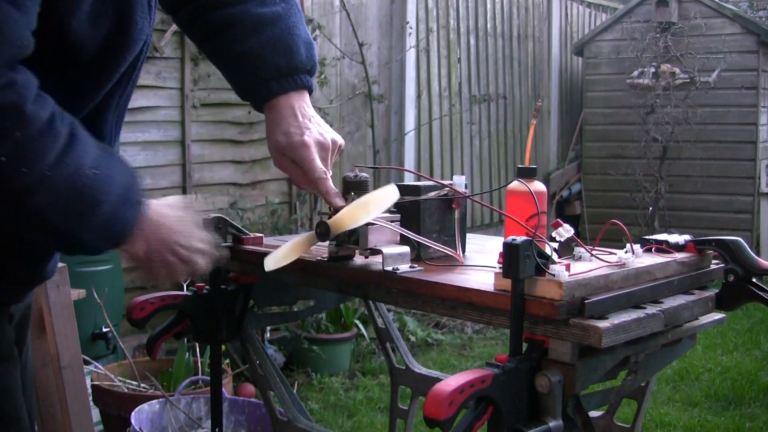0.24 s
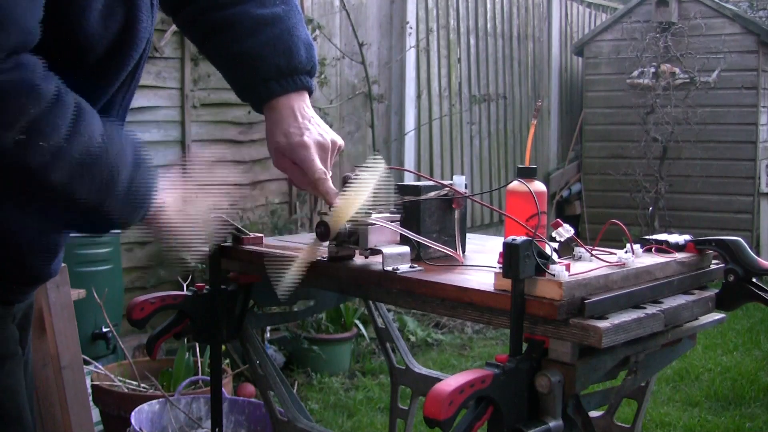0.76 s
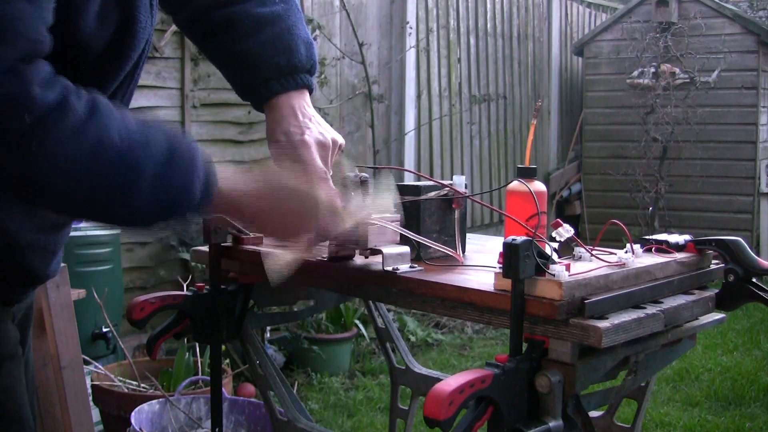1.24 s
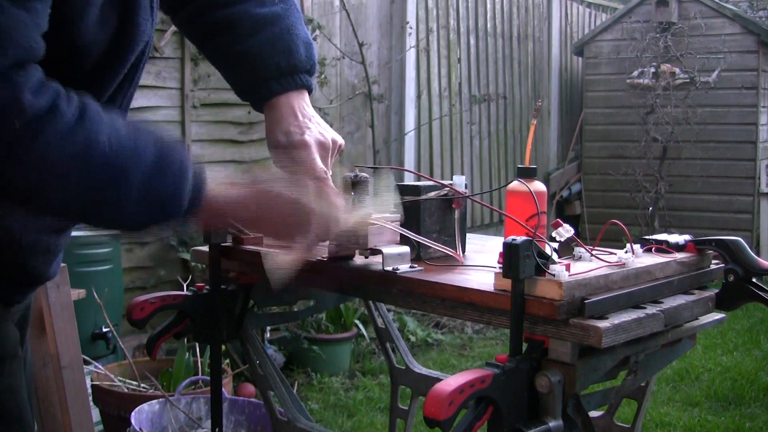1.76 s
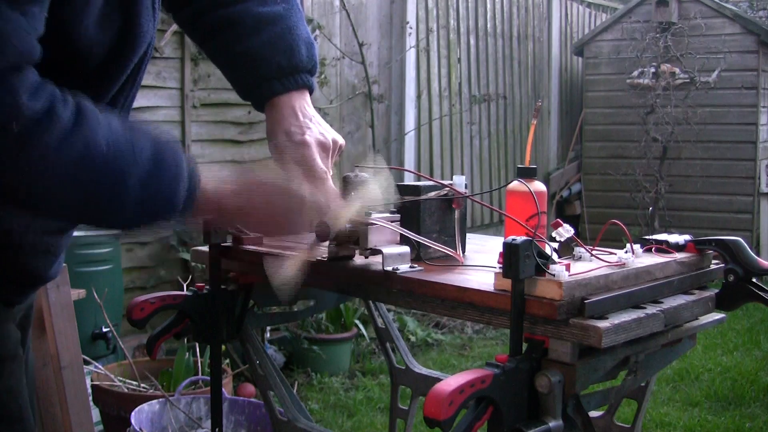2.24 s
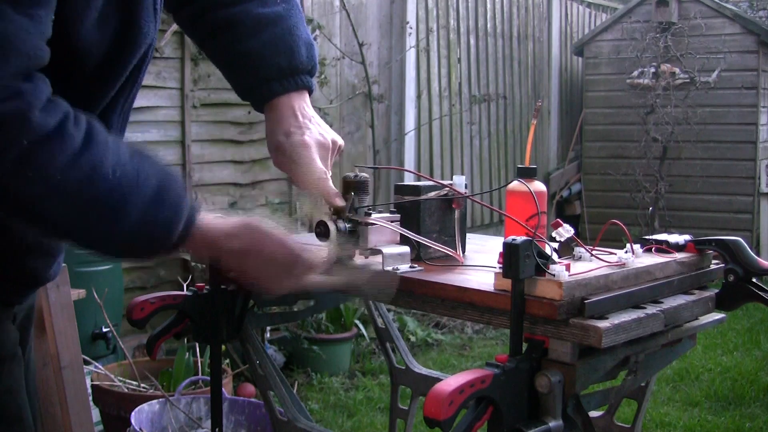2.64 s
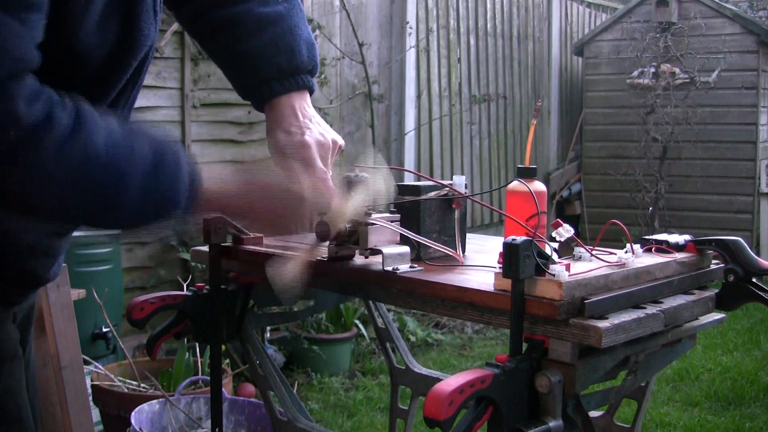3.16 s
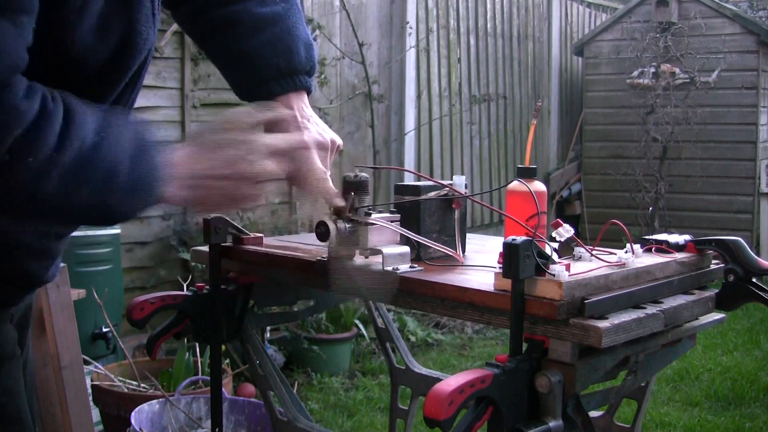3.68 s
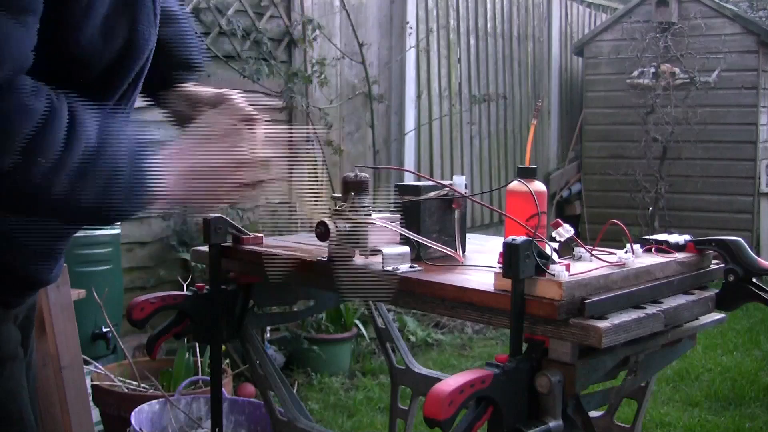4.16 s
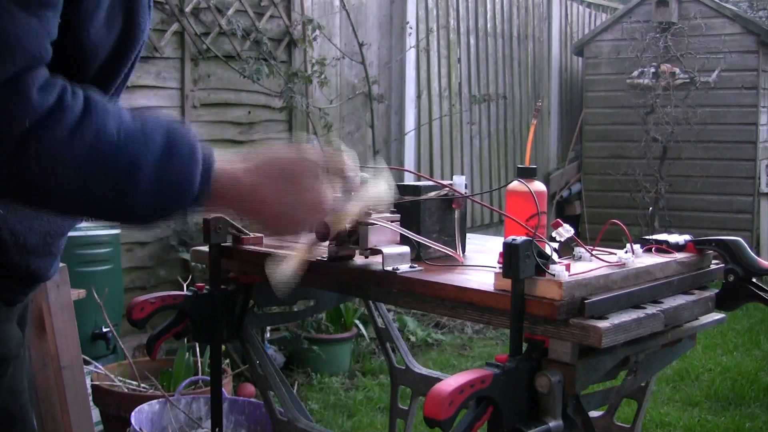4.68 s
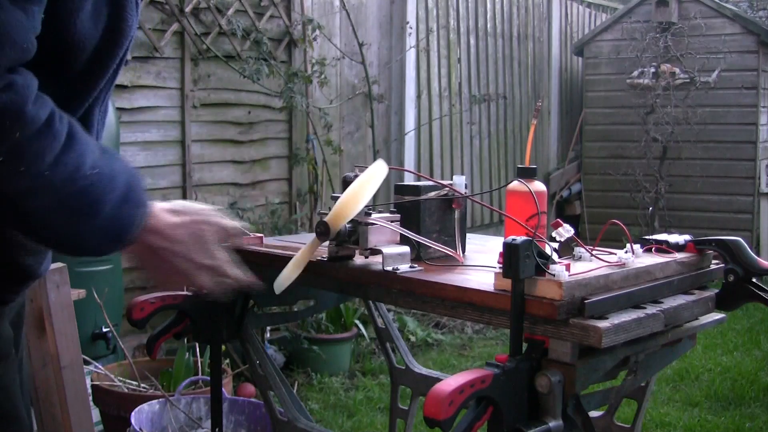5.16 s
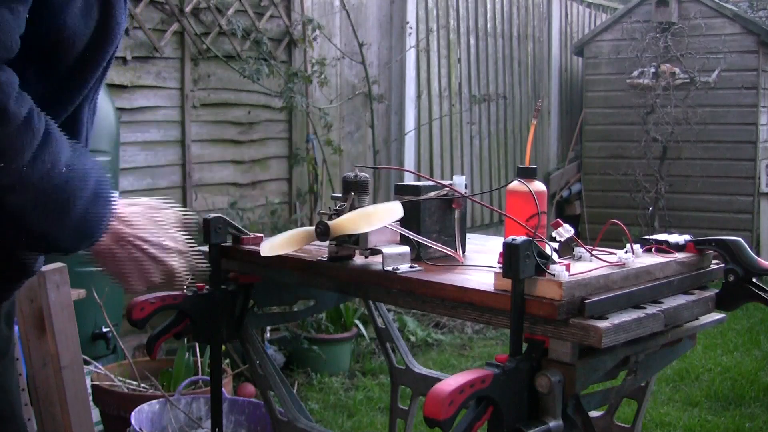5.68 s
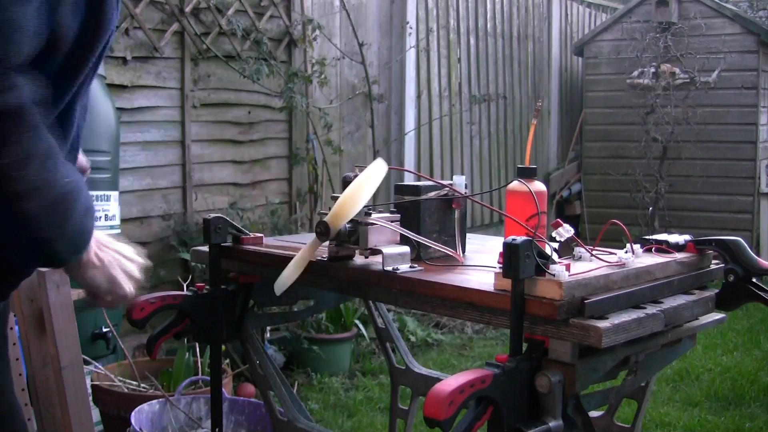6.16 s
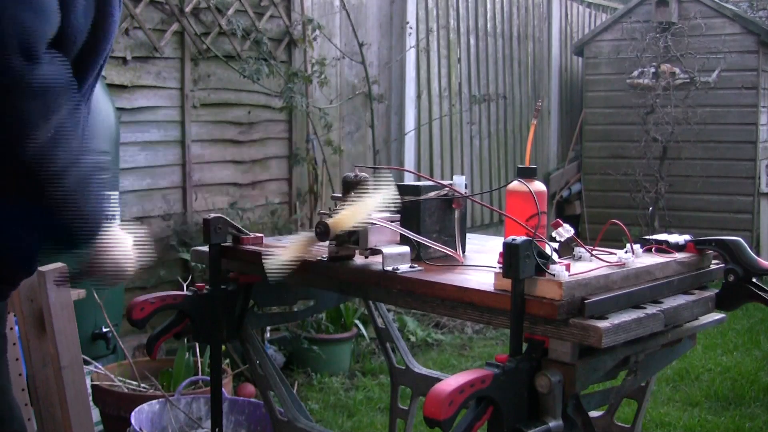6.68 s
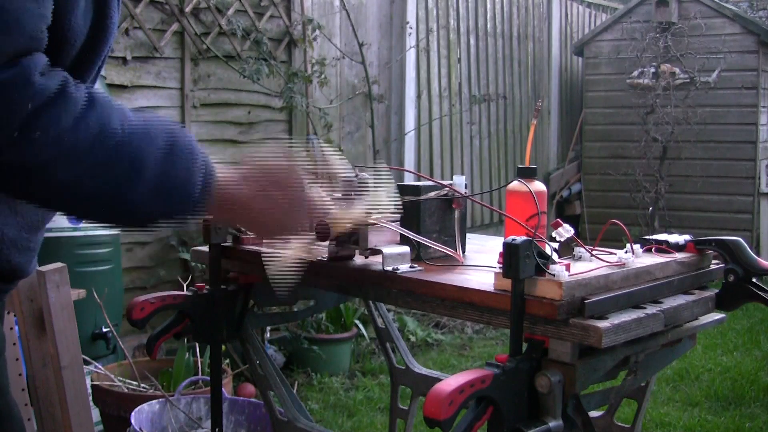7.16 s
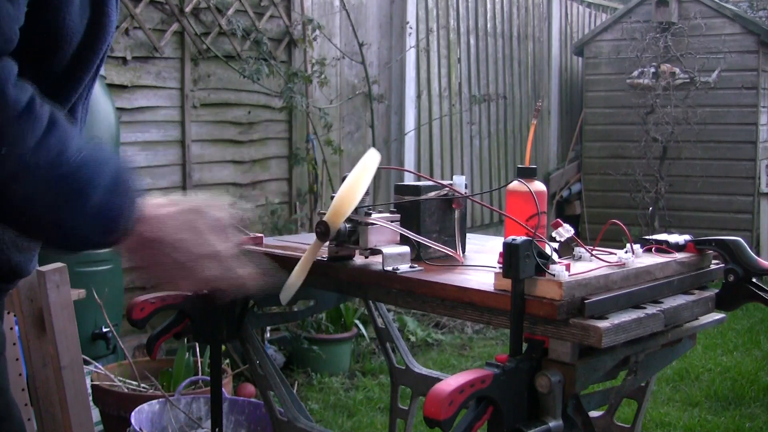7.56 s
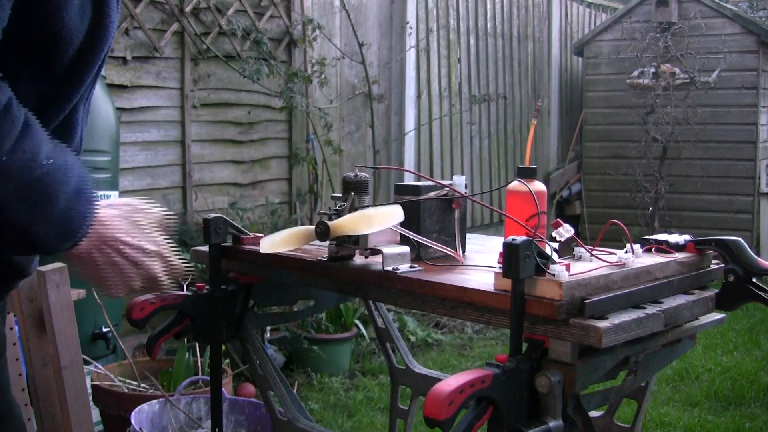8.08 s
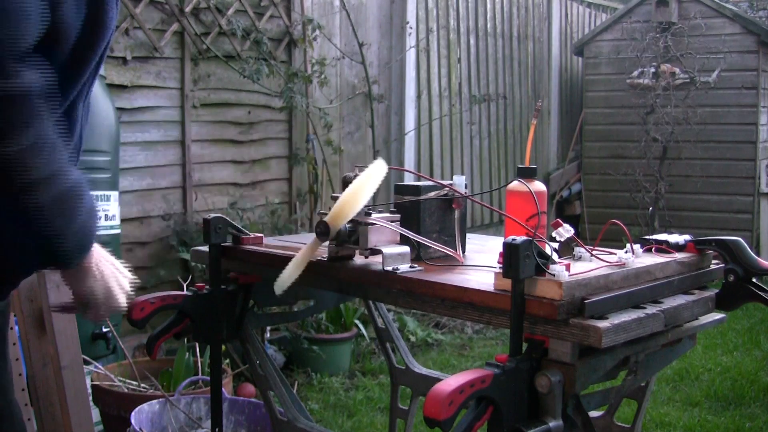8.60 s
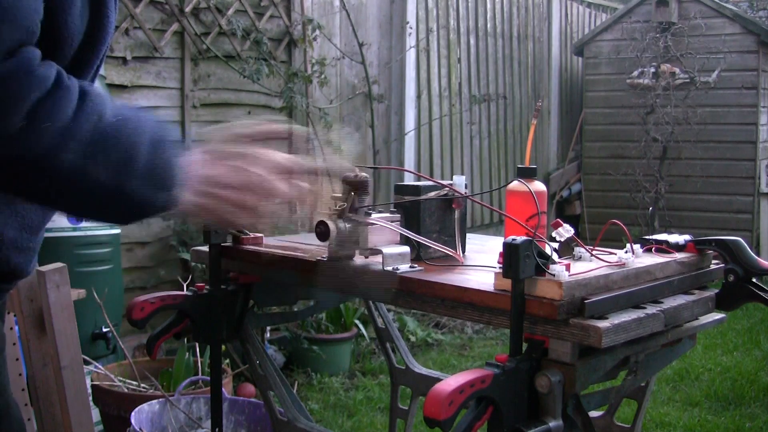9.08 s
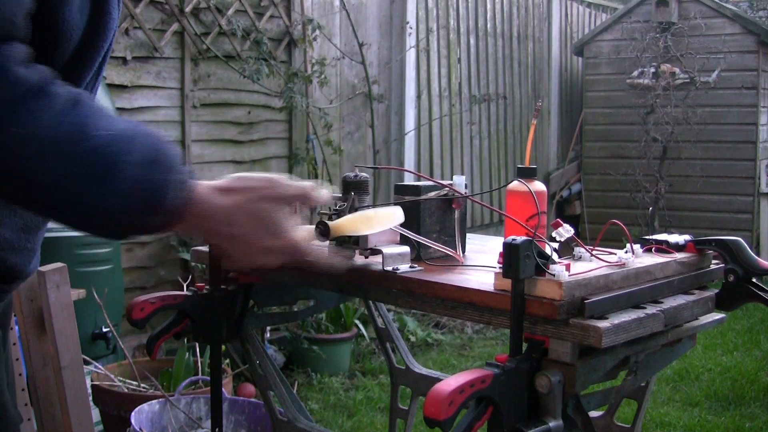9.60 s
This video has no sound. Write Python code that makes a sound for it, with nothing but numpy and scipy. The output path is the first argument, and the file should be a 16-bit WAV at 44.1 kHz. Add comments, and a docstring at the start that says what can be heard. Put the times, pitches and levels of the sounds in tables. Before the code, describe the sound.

A small engine on a wooden workbench is flicked by hand in a fenced yard, heard close in stereo with short, scattered echoes. A soft pop at 0.03 s leads at once to a loud clack and thud near 0.16-0.18. From 0.7 to 4 s flicks come roughly every half second: crisp finger ticks, hollow midrange pops and, between them, low woody compression thuds. A snappy clack and rattles cluster at 4.0-4.6, then a pop at 5.0 with a tiny hiss, and a bright slap at 5.5. Strong flicks land at 6.1, 7.3 and 8.6, each trailing a faint fuzzy whistle near 3 kHz that sinks slightly; the hardest metallic clacks crack at 6.7, 7.9 and 9.2. A weak flick ends it at 9.8. Sleeves rustle softly with each swing; low distant town air and very faint bird chirps remain. The engine never runs.

```python
"""A model engine clamped to a workbench in a fenced yard is flicked over by hand and never catches.
Each flick sums short coloured noise bursts: finger tick, knock, thud of compression, pop at the port.
Clacks, from faint to hard, wake metal modes; the bench rings and the fences scatter each blow as noise.
Trapped air past the piston is a hiss with a fuzzy whistle; sleeves and town air are shaped noise,
and faint far birds are falling sine notes."""
import sys
import numpy as np
from scipy import signal
from scipy.fft import rfft, irfft, next_fast_len
from scipy.io import wavfile
from scipy.ndimage import uniform_filter1d

SR = 44100
rng = np.random.default_rng(int(sys.argv[2]) if len(sys.argv) > 2 else 0)


def generate_wav(sig):
    """Save sig (samples, or channels by samples) to the path in sys.argv[1] as 16-bit PCM at SR."""
    pcm = np.round(np.clip(np.atleast_2d(sig).T, -1, 1) * 32767).astype(np.int16)
    wavfile.write(sys.argv[1], SR, pcm)


N = 433944  # samples
BLOW_N = 12288  # samples in one blow with its echoes

# Levels of FLICKS, THUMPS, BRUSHES and CLACKS precede the common gain of each kind of blow.
# finger snaps the blade through compression: t/s, swing until the port opens/s, tick/dB, knock/dB,
# pop/dB, thud/dB, treble tilt/(dB/octave)
FLICKS = [(0.0251, 0.012, -35, -56, -18.5, -35.5, 2), (0.1561, 0.0039, -13, -16.5, -21.5, -19, -3.5),
          (0.7113, 0.0186, -34.5, -57, -34, -52, 0), (0.839, 0.0068, -31, -42, -22.5, -31.5, -3),
          (1.4506, 0.008, -19, -42, -23, -28.5, -3.5), (1.9729, 0.009, -31, -29.5, -23, -29.5, -0.5),
          (2.4344, 0.009, -13, -25, -22, -33, -2), (2.9051, 0.016, -17, -27.5, -26, -29.5, -3),
          (3.3428, 0.012, -17, -24, -21.5, -32.5, -2.5), (3.7925, 0.019, -20, -26, -33, -25.5, -1),
          (4.0437, 0.0037, -23, -28, -41, -26, -2.5), (4.2652, 0.013, -15, -19, -28, -26, 1.5),
          (4.6417, 0.004, -16, -30, -39, -35.5, -1.5), (4.9097, 0.012, -30, -25, -31, -32.5, 3),
          (4.9778, 0.00091, -22, -26, -17, -40, -1.5), (5.5135, 0.0044, -46, -33, -26.5, -31.5, -5),
          (6.1411, 0.016, -16.5, -17.5, -18.5, -30, 5), (6.667, 0.012, -35, -27, -34, -25, 0),
          (7.3339, 0.0093, -19.5, -22.5, -20, -27, 1), (7.877, 0.012, -22, -22.5, -33, -17, -1.5),
          (8.589, 0.014, -24, -21.5, -24, -28, 2.5), (9.1603, 0.014, -35, -29.5, -41, -23, -1),
          (9.7666, 0.018, -34, -50, -34, -41, -5.5)]
# piston runs heavily into compression: t/s, level/dB, treble tilt of its tick and thud/(dB/octave), ring f/Hz
THUMPS = [(0.178, -18.5, -0.5, 600), (1.206, -30.5, 0.5, 343), (1.73, -27.5, 0.5, 390),
          (1.758, -38.5, 3.5, 339), (2.217, -22.5, 1.5, 430), (2.692, -22.5, 0, 470),
          (3.145, -21, 1.64, 520), (3.587, -23.5, 1.1, 288), (4.145, -35, -3, 368), (4.642, -30, -2, 347),
          (4.723, -41, -4, 345), (5.527, -25.5, -2.5, 350), (6.682, -23, 0.5, 218), (7.891, -26, 1.5, 231),
          (9.174, -29.5, -2, 230)]
# fingers brush or slap the blade: t/s, level/dB, treble tilt/(dB/octave)
BRUSHES = [(0.501, -33.5, 3), (1.2231, -33, 2), (1.8537, -36, -2), (2.802, -37, -1), (3.249, -35, -1),
           (4.572, -36, 4), (5.5257, -15, -2), (7.3987, -27, -4)]
# clacks of piston and propeller, from faint rattles to hard snaps: t/s, level/dB, treble tilt/(dB/octave)
CLACKS = [(0.155, -18.5, -6.5), (0.1771, -13, -3.5), (4.0436, -16.5, -1.3), (4.2767, -24, -2),
          (4.3597, -32.5, -4.5), (4.4754, -36.5, 0), (4.58, -28, -8.5), (5.4919, -36.5, -6),
          (5.5614, -29.5, 0), (6.0664, -35.5, -4.5), (6.6988, -10, -0.3), (7.9043, -9, 0),
          (8.096, -41, -4.5), (9.1901, -11, -0.5)]
# relative colour of the finger's tick: f/Hz, density/(dB per Hz)
TICK_COLOUR = [(100, -32), (1000, -9), (2500, -4), (5000, -3.5), (8000, 1), (13000, 3.5), (16000, -4.5)]
# relative colour of clack and knock: f/Hz, density/(dB per Hz)
CLACK_COLOUR = [(25, -44), (60, -31), (140, -2.5), (400, -11.5), (900, -1.5), (1500, -4), (2300, 0),
                (3800, 0.5), (4800, -4), (7000, -5.5), (8800, -11.5), (10500, -9.5), (16000, -17)]
# relative colour of the port's pop: f/Hz, density/(dB per Hz)
POP_COLOUR = [(60, -42), (140, -30.5), (450, 0.5), (900, -1), (1500, 2), (2400, -2), (3200, -13.5),
              (4500, -26), (9000, -45), (16000, -39)]
# relative colour of the compression thud: f/Hz, density/(dB per Hz)
THUD_COLOUR = [(25, -49), (50, -42), (90, -8.5), (130, 3.5), (230, 0.5), (450, -6), (700, -9),
               (1100, -15.5), (2000, -22), (4000, -32.5), (8000, -45.5), (16000, -40)]
# resonances and hollows of bench with engine: f/Hz, width/Hz (floored at f/55), gain/dB
BENCH_MODES = [(104, 56, -7), (183, 31, -7), (345, 48, 8.5), (455, 30.4, 13), (495, 158, -7),
               (510.3, 27, 12.5), (576.5, 43, 8.5), (678.5, 33, 8), (709, 34, -8.5), (825, 29, -11.5),
               (847, 95, 7.5), (888, 25, -16), (1068, 7.7, -13), (1110, 14, 4.5), (1207, 60, 3.5),
               (1330, 35, 3), (1499, 103, 8), (1637, 12, 2.5), (1755, 50, 13.5), (1790, 120, -12),
               (1950, 110, 5), (2160, 35, -8.5), (2160, 9.4, -18), (2130, 42, 1.5), (2155, 110, 6.5),
               (2370, 7.7, -7.5), (3320, 160, -8.5), (3340, 14, 10.5)]
# metal modes woken by clacks and knocks: f/Hz, width/Hz (floored at f/55), gain/dB
METAL_MODES = [(590, 40, 4), (1997, 36, 4), (2165, 40, 5), (2226, 40, 5), (2332, 42, 3), (2670, 70, 2),
               (3410, 70, 2), (3940, 70, 2)]
# echo decay in the yard, before the late cut: f/Hz, t60/s
YARD_T60 = [(150, 0.26), (450, 0.16), (1000, 0.15), (2700, 0.19), (7000, 0.17), (15000, 0.15)]
# left-right likeness of yard sound: f/Hz, likeness/1
YARD_LIKENESS = [(200, 0.94), (2000, 0.99), (4500, 0.84), (9000, 0.52), (15000, 0.1)]
# relative colour of rubbing cloth: f/Hz, density/(dB per Hz)
RUSTLE_COLOUR = [(50, -30), (300, 18.5), (1500, 11), (4000, 8.5), (8000, 1.5), (13000, -4.5), (16000, -38)]
# other hand shifts and lets go: middle t/s, half length/s, level/dB
RUBS = [(1.59, 0.062, -50), (4.3, 0.33, -56)]
# relative colour of distant town and air: f/Hz, density/(dB per Hz)
AIR_COLOUR = [(15, -45), (25, -34), (53, 9.5), (80, -20), (130, 0), (236, -8.5), (270, -2), (373, -9),
              (503, -9.5), (591, -9), (734, -13), (818, -10), (1070, -20.5), (3820, -31.5), (16000, -35.5)]
# left-right likeness of the air: f/Hz, likeness/1
AIR_LIKENESS = [(60, 0.75), (180, 0.81), (550, 0.17), (1650, 0.2), (4970, 0.072), (15000, 0.09)]
# faint far birds: t/s, length/s, start f/Hz, end f/Hz, level before the blur/dB
CHIRPS = [(4.11, .05, 3450, 3380, -58), (8.41, .08, 3950, 3200, -59), (9.06, .05, 4600, 4300, -62)]
# air squeezed past the resting piston: t/s, length/s, initial whistle/dB, initial hiss/dB,
# settled whistle f/Hz, whistle width/Hz
LEAKS = [(5.02, 0.12, -50, -53.5, 2960, 190), (6.182, 0.25, -54.5, -49, 3000, 320),
         (7.375, 0.67, -57, -51.5, 2980, 420), (8.627, 0.69, -56.5, -51, 2985, 440)]
# relative colour of the leak's hiss: f/Hz, density/(dB per Hz)
LEAK_COLOUR = [(1500, -12), (3000, 0.5), (6000, -4.5), (10000, -4.5), (16000, -10)]
# phase between microphone ports: f/Hz, lead of left/rad
PORT_PHASE = [(0, -0.54), (6290, 0.41), (11300, 1.2), (12800, 0.68), (15500, 1.3), (16400, -0.5)]
# balance of microphone ports: f/Hz, left minus right/dB
PORT_BALANCE = [(60, 1.5), (150, 1.5), (380, 2), (950, 3), (2380, 0.5), (5980, 1.0), (15000, 2.0)]

TICK_RING_HZ, KNOCK_RING_HZ, CLACK_RING_HZ, POP_RING_HZ, THUD_RING_HZ = 5200, 1500, 2310, 1600, 493
# a finger covers the intake for the first flicks: their ticks scatter less
CHOKE_UNTIL_S, CHOKED_SCATTER_DB, OPEN_SCATTER_DB = 4.0, -2.5, 1
KNOCK_SCATTER_DB, CLACK_SCATTER_DB, BRUSH_SCATTER_DB, THUMP_SCATTER_DB = 6, -1.5, 4.5, 0
KNOCK_TILT_DB_PER_OCT, THUD_TILT_DB_PER_OCT = -3.26, 1.35  # knock: added to the flick's tilt
THUD_SHARE = 0.6  # part of the swing after which compression peaks
PUSH_DB = -5.5  # finger's first shove on the bench, re thud
THUMP_TICK_DB = -8  # re thump, before the common gains
RUSTLE_DB, SWING_DB, SWING_HALF_S, SWING_LAG_S = -60.5, -58.5, 0.1, 0.097
AIR_DB = -47.0  # before the high-pass
WHISTLE_FADE_DB_PER_S, HISS_FADE_DB_PER_S = 11, 30
EDGE_HZ = 16100


def gain_of(db):
    """Decibels to amplitude."""
    return 10 ** (np.asarray(db) / 20)


def evened(x):
    """Scales to an rms of 1."""
    return x / np.sqrt(np.mean(abs(x) ** 2) + 1e-20)


def unit(x):
    """Scales to a mean energy of 1 per channel."""
    return evened(x) / np.sqrt(x.shape[-1])


def read(points, hz):
    """Reads a table on a log-frequency axis."""
    f, value = np.transpose(points)
    return np.interp(np.log(hz + 1), np.log(f + 1), value)


def add(mix, s, sound):
    """Mixes a sound in at time s."""
    part = mix[:, max(round(s * SR), 0):][:, :sound.shape[-1]]
    part += sound[..., :part.shape[1]]


def pair(z, likeness, hz):
    """Blends two unrelated spectra into a left and a right one of given likeness."""
    same = np.clip(read(likeness, hz), -1, 1)
    return np.array([z[0], same * z[0] + np.sqrt(1 - same ** 2) * z[1]])


def wash(colour, likeness, patchy_db, swell_db):
    """Stereo noise of rms 1 with drifting patches and a slow swell."""
    frames, hz = N // 512 + 5, np.fft.rfftfreq(2048, 1 / SR)
    real, imag = rng.standard_normal((2, 2, frames, len(hz)))
    patches = uniform_filter1d(rng.standard_normal(real.shape[1:]), size=9, axis=0)
    patches = evened(uniform_filter1d(patches, size=8, axis=1))
    swell = evened(uniform_filter1d(rng.standard_normal(frames), size=40))[:, None]
    level_db = read(colour, hz) + patchy_db * patches + swell_db * swell
    z = pair(real + 1j * imag, likeness, hz) * gain_of(level_db)
    noise = signal.istft(z.transpose(0, 2, 1), nperseg=2048, noverlap=2048 * 3 // 4)[1]
    return evened(noise[:, :N])


def air():
    """Distant town and air: coloured noise, high-passed."""
    noise = gain_of(AIR_DB) * wash(AIR_COLOUR, AIR_LIKENESS, patchy_db=1.15, swell_db=.5)
    return signal.sosfilt(signal.butter(4, 35, "highpass", fs=SR, output="sos"), noise)


def sleeves():
    """Cloth and skin rub softly all the time, swelling with each swing of the arm."""
    t = np.arange(0, N, 256) / SR
    swells = [(row[0] + SWING_LAG_S, SWING_HALF_S, SWING_DB) for row in FLICKS] + list(RUBS)
    power = gain_of(RUSTLE_DB) ** 2
    for s, half_s, db in swells:
        power = power + gain_of(db) ** 2 * np.exp(-((t - s) / half_s) ** 2)
    cloth = wash(RUSTLE_COLOUR, YARD_LIKENESS, patchy_db=1.5, swell_db=.5)
    return np.interp(np.arange(N) / SR, t, np.sqrt(power)) * cloth


def causal(db):
    """Minimum-phase response with these gains: rings only after it is struck."""
    log_gain = np.log(gain_of(np.maximum(db, -100)))
    return np.exp(np.conj(signal.hilbert(np.r_[log_gain, log_gain[-2:0:-1]])))[:len(db)]


def bumps(modes, hz):
    """Gain in dB of a set of resonances; clamps and wood damp the high ones."""
    return sum(db / (1 + (2 * (hz - f) / max(width, f / 55)) ** 2) for f, width, db in modes)


def smoothed(x, below_hz=2600):
    """Evens out the chance peaks in the low spectrum of a noise burst."""
    z, hz = rfft(x), np.fft.rfftfreq(x.shape[-1], 1 / SR)
    size = abs(evened(z))
    return irfft(z / (size + 0.068) ** (1 / (1 + (hz / below_hz) ** 4)))


def scatter(hold_s, rise_s=0.0057, lumps_db=1.5):
    """Echoes from bench, fences and shed: held for a moment, then decaying at a rate set by frequency."""
    t = np.arange(BLOW_N) / SR
    lumps = gain_of(lumps_db * evened(uniform_filter1d(rng.standard_normal(BLOW_N), size=90)))
    hz, at, z = signal.stft(rng.standard_normal((2, BLOW_N)) * lumps, SR, nperseg=128)
    z = z * gain_of(-60 * np.maximum(at - hold_s, 0) / read(YARD_T60, hz)[:, None])
    tail = smoothed(signal.istft(z, SR, nperseg=128)[1][:, :BLOW_N])
    late_cut = 1 / (1 + (t / 0.14) ** 4)
    return unit(tail * (1 - np.exp(-t / rise_s)) * late_cut)


def blows(rows, colour, modes, level_db, rise_s, contact_s, scatter_db, hold_s,
          ring_db, ring_share, ripple_db):
    """Each blow is a short contact and its echoes, coloured by the part struck and by the bench."""
    t, hz, out = np.arange(BLOW_N) / SR, np.fft.rfftfreq(BLOW_N, 1 / SR), np.zeros((2, N))
    body_db = read(colour, hz) + bumps(modes, hz)
    octaves = np.log2(np.maximum(hz, 200) / 1000)
    force = (1 - np.exp(-t / rise_s)) ** 2 * np.exp(-t / contact_s)
    for s, db, tilt, wet_db, ring_hz in rows:
        contact = unit(smoothed(rng.standard_normal(BLOW_N) * force) * force ** 0.059)
        echoes = pair(rfft(scatter(hold_s)), YARD_LIKENESS, hz)
        # each blow gets its own random ripple of gain, growing toward the treble
        ripple = signal.oaconvolve(rng.standard_normal(len(hz)), np.hanning(BLOW_N // 128), "same")
        ripple = ripple_db * evened(ripple) * hz / (hz + 2500)
        ring = bumps([(ring_hz, ring_share * ring_hz, ring_db)], hz)
        response = evened(causal(body_db + tilt * octaves + ring + ripple))
        wet = gain_of(scatter_db + wet_db)
        gain = gain_of(db + level_db) / np.hypot(1, wet)
        add(out, s, gain * irfft(response * (rfft(contact) + wet * echoes)))
    return out


def strokes():
    """A flick is tick, knock and shove, then thud, then pop: rows t/s, dB, tilt, scatter/dB, ring/Hz."""
    ticks, clacks, pops, thuds = [], [], [], []
    for s, swing_s, tick_db, knock_db, pop_db, thud_db, tilt in FLICKS:
        wet_db = CHOKED_SCATTER_DB if s < CHOKE_UNTIL_S else OPEN_SCATTER_DB
        ticks.append((s, tick_db, tilt, wet_db, TICK_RING_HZ))
        clacks.append((s, knock_db, tilt + KNOCK_TILT_DB_PER_OCT, KNOCK_SCATTER_DB, KNOCK_RING_HZ))
        thuds.append((s, thud_db + PUSH_DB, THUD_TILT_DB_PER_OCT, THUMP_SCATTER_DB, THUD_RING_HZ))
        thuds.append((s + THUD_SHARE * swing_s, thud_db, THUD_TILT_DB_PER_OCT, 0, THUD_RING_HZ))
        pops.append((s + swing_s, pop_db, tilt, 0, POP_RING_HZ))
    for s, db, tilt, ring_hz in THUMPS:
        ticks.append((s, db + THUMP_TICK_DB, tilt, BRUSH_SCATTER_DB, TICK_RING_HZ))
        thuds.append((s, db, tilt, THUMP_SCATTER_DB, ring_hz))
    ticks += [(s, db, tilt, BRUSH_SCATTER_DB, TICK_RING_HZ) for s, db, tilt in BRUSHES]
    clacks += [(s, db, tilt, CLACK_SCATTER_DB, CLACK_RING_HZ) for s, db, tilt in CLACKS]
    return ticks, clacks, pops, thuds


def finger_ticks(rows):
    """Finger on propeller: the shortest contact, with a ring in the treble."""
    return blows(rows, TICK_COLOUR, BENCH_MODES, level_db=10.5, rise_s=0.00017, contact_s=0.00073,
                 scatter_db=1.5, hold_s=0.0061, ring_db=8, ring_share=0.16, ripple_db=5.5)


def knocks_and_clacks(rows):
    """Knocks and clacks of piston and propeller: short contact that also wakes the metal."""
    return blows(rows, CLACK_COLOUR, BENCH_MODES + METAL_MODES, level_db=18.0, rise_s=0.00042,
                 contact_s=0.0035, scatter_db=2.0, hold_s=0.0071, ring_db=5.5, ring_share=0.37,
                 ripple_db=3.5)


def compression_thuds(rows):
    """Shove and compression load the bench: the longest, lowest contact."""
    return blows(rows, THUD_COLOUR, BENCH_MODES, level_db=24.5, rise_s=0.001, contact_s=0.012,
                 scatter_db=5.0, hold_s=0.023, ring_db=6.5, ring_share=0.43, ripple_db=7.5)


def port_pops(rows):
    """The port opens on pressed air: a midrange burst with little ring."""
    return blows(rows, POP_COLOUR, BENCH_MODES, level_db=19.5, rise_s=0.00082, contact_s=0.0061,
                 scatter_db=-1.0, hold_s=0.0073, ring_db=1.0, ring_share=0.3, ripple_db=3.5)


def engine():
    """Sums the four kinds of blow of flicks, thumps, brushes and clacks."""
    ticks, clacks, pops, thuds = strokes()
    return finger_ticks(ticks) + knocks_and_clacks(clacks) + compression_thuds(thuds) + port_pops(pops)


def birds():
    """Short falling notes, blurred by the gardens they cross."""
    out = np.zeros((2, N))
    for s, length_s, start_hz, end_hz, db in CHIRPS:
        hz = np.linspace(start_hz, end_hz, round(length_s * SR))
        note = gain_of(db) * evened(np.sin(2 * np.pi * np.cumsum(hz) / SR) * np.hanning(len(hz)))
        add(out, s, signal.fftconvolve(note[None], scatter(hold_s=.02), axes=1))
    return out


def leaks(lift_hz=190, settle_s=0.13):
    """Trapped air hisses through a narrow gap; its fuzzy whistle sinks as the pressure falls."""
    out = np.zeros((2, N))
    hiss = wash(LEAK_COLOUR, YARD_LIKENESS, patchy_db=1.5, swell_db=.3)
    for s, length_s, whistle_db, hiss_db, hz, width_hz in LEAKS:
        t = np.arange(round(length_s * SR)) / SR
        # narrow-band complex noise makes the whistle fuzzy
        pole = np.exp(-np.pi * width_hz / SR)
        noise = rng.standard_normal(len(t)) + 1j * rng.standard_normal(len(t))
        flutter = signal.lfilter([1], np.poly([pole, pole]), noise)
        pitch_hz = hz + lift_hz * np.exp(-t / settle_s)
        whistle = evened((flutter * np.exp(2j * np.pi * np.cumsum(pitch_hz) / SR)).real)
        jet = evened(hiss[:, round(s * SR):][:, :len(t)])
        sound = gain_of(whistle_db - WHISTLE_FADE_DB_PER_S * t) * whistle
        sound = sound + gain_of(hiss_db - HISS_FADE_DB_PER_S * t) * jet
        # flow starts quickly and trails off
        flow = np.minimum(t / .012, 1) * (1 - (t / length_s) ** 4)
        add(out, s, sound * flow)
    return out


def scene():
    """Engine, sleeves, birds and leaking air over the quiet of the yard."""
    return air() + sleeves() + engine() + birds() + leaks()


def record(dry):
    """Two close microphone ports differ a little in level and phase; then the band limit."""
    size = next_fast_len(N + BLOW_N)
    hz = np.fft.rfftfreq(size, 1 / SR)
    left = gain_of(read(PORT_BALANCE, hz) / 2) * np.exp(.5j * read(PORT_PHASE, hz))
    heard = irfft(rfft(dry, size) * np.array([left, 1 / left]), size)[:, :N]
    low_pass = signal.firwin(255, EDGE_HZ, window=("kaiser", 9), fs=SR)
    return signal.oaconvolve(heard, low_pass[None], "same")


dry = scene()
out = record(dry)
generate_wav(out)
```